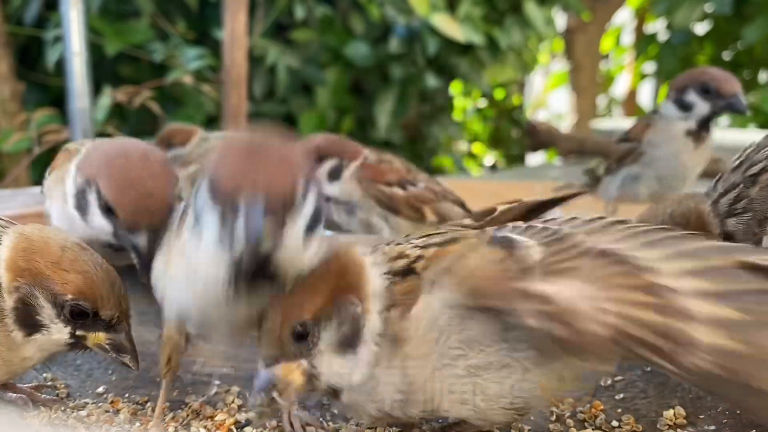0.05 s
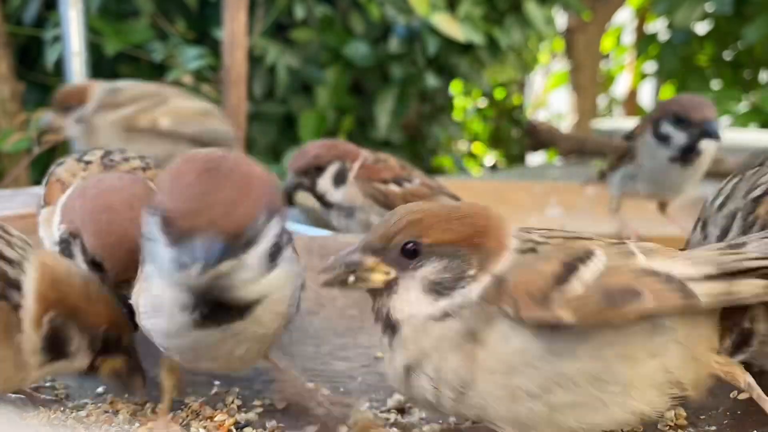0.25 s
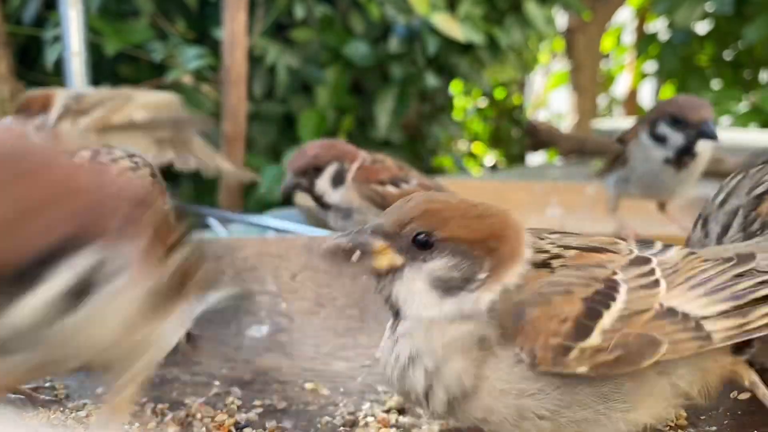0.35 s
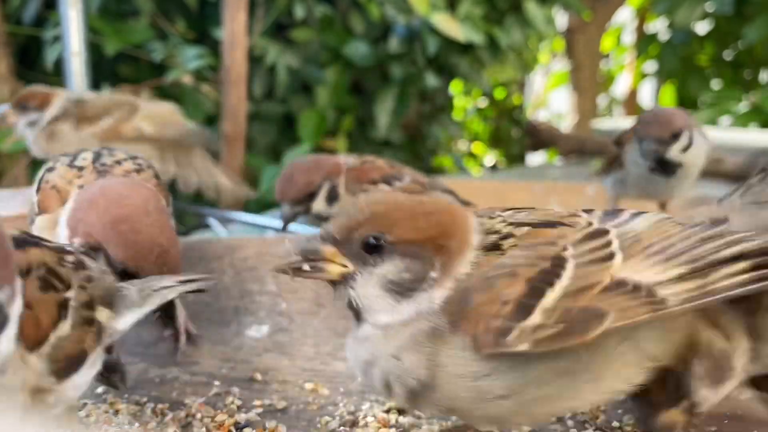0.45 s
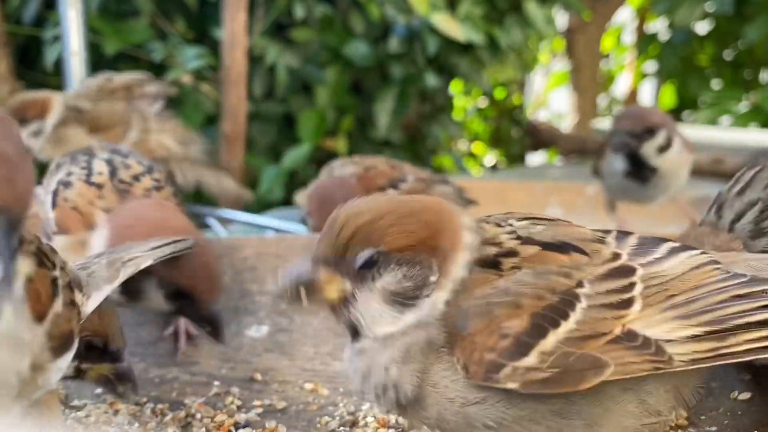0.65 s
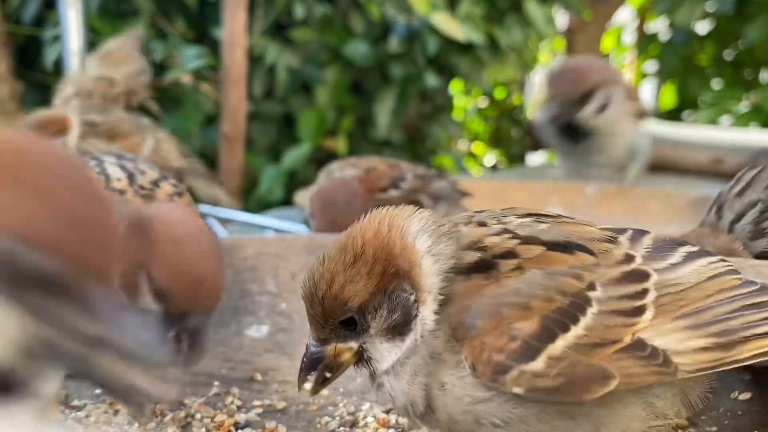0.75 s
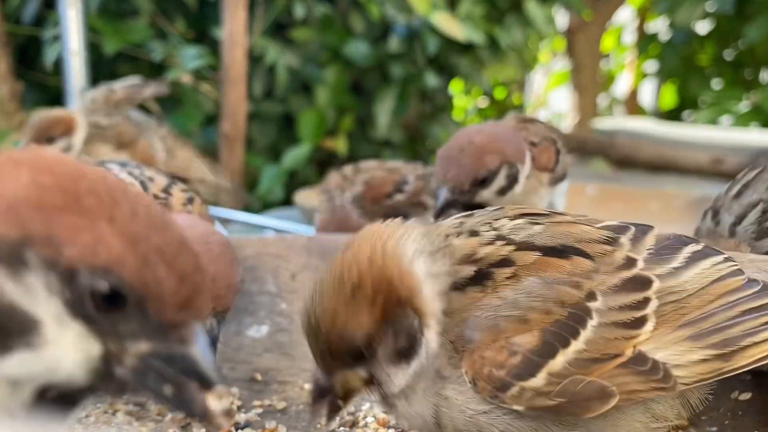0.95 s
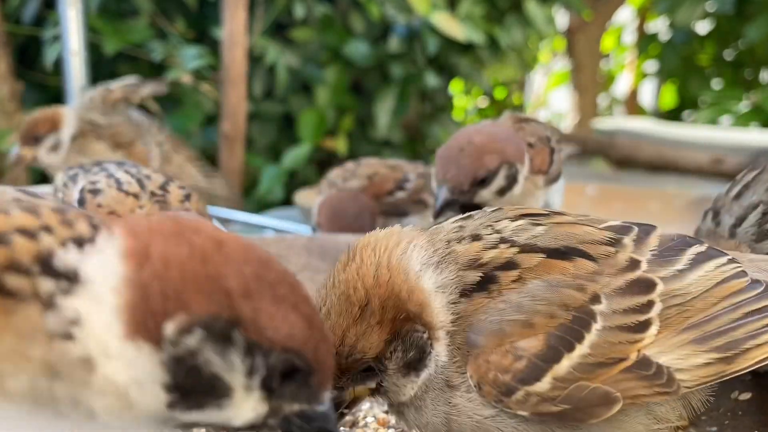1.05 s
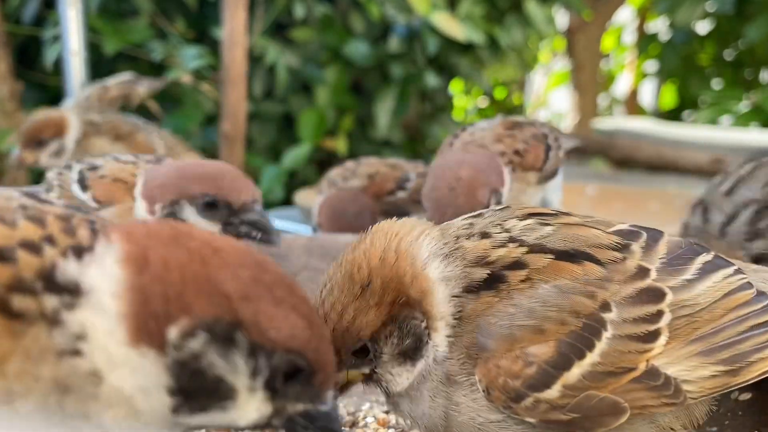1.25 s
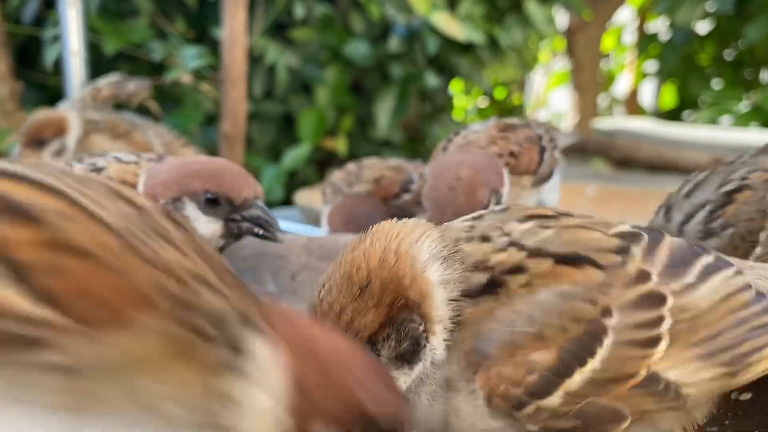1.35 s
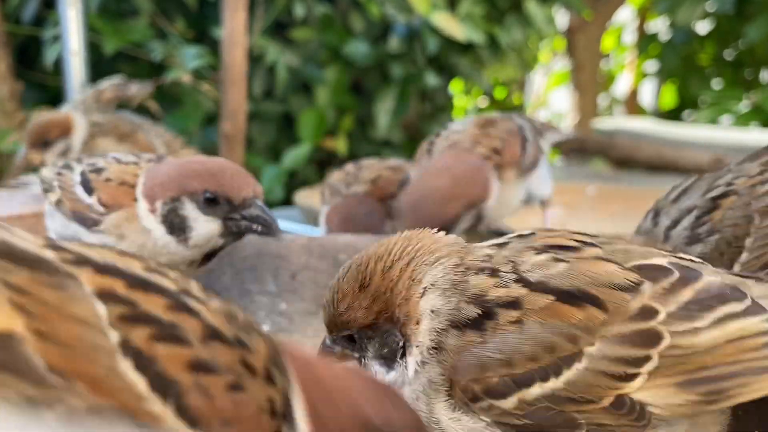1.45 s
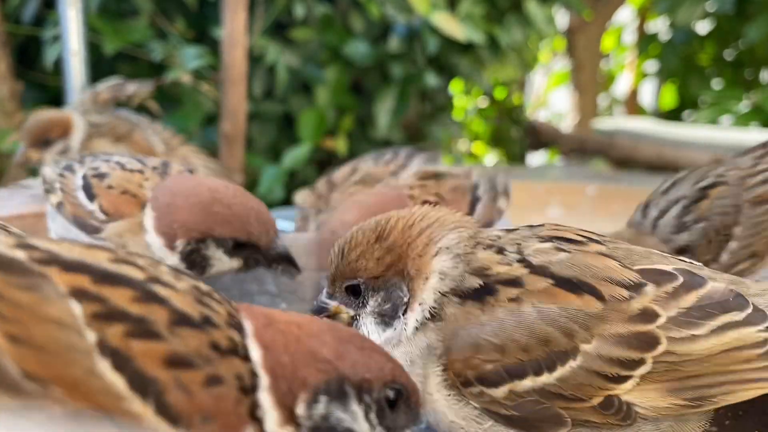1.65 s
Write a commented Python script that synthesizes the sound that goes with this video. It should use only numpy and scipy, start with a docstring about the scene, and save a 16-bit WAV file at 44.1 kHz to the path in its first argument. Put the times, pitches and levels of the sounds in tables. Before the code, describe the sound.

A sparrow chirps sharply twice, followed by light pecks and cracking seeds on a tray.

```python
"""Light taps, cracking seeds and a flutter come first: sparrows feed on a tray in a quiet garden.
Each beak blow excites the tray's damped modes; husks and wings give bursts and swells of noise.
A hand's width away, one bird gives two sharp, warbling chirps, and a third begins at the end.
Its syrinx makes a gliding whistle with hoarse edges, and its open beak filters the overtones."""
import sys
import numpy as np
from scipy import signal
from scipy.fft import rfft, irfft
from scipy.io import wavfile
from scipy.ndimage import uniform_filter1d

SR = 44100
rng = np.random.default_rng(int(sys.argv[2]) if len(sys.argv) > 2 else 0)


def output_pcm(signal):
    """Save a mono or channel-first signal as 16-bit PCM at the path in sys.argv[1].

    Samples are clipped to [-1, 1] before scaling.
    """
    pcm = np.clip(np.atleast_2d(signal).T, -1, 1) * 32767
    wavfile.write(sys.argv[1], SR, np.round(pcm).astype(np.int16))


N = 74970
TIME = np.arange(N) / SR

# Spectrum of the garden's background: frequency_hz, gain_db
GARDEN_SPECTRUM = [(24, -44), (36, -14), (48, 2), (105, -1), (170, -5), (300, -10.5), (620, -7.5),
                   (1000, -11.5), (2100, -18.5), (4600, -18.5), (8300, -29.5), (11500, -34.5), (13500, -49),
                   (15500, -29)]
# Likeness of that background at the two ears: frequency_hz, correlation
GARDEN_CORRELATION = [(60, 0.84), (170, 0.72), (300, 0.52), (550, -0.55), (1650, -0.25), (5000, 0.44),
                      (15000, -0.63)]
# Brushes of feet and feathers: start_s, length_s, level_db, centre_hz, half_width_octaves
BRUSH_STROKES = [(0, 0.15, -48, 51, 0.78), (0, 0.06, -51, 3570, 1.1), (0.165, 0.0099, -48.5, 3600, 0.64),
                 (0.418, .08, -51.5, 57, 0.16), (0.815, 0.042, -49.5, 66.4, 0.23),
                 (.911, 0.024, -47, 2180, 0.54), (0.899, .04, -53, 277, 0.32),
                 (1.1, 0.037, -48.5, 546, 0.1), (1.651, 0.044, -50, 222, 0.96)]
# Seed husks cracking, and the beak's tick just before the peck at 1.178 s: start_s, level_db, centre_hz
SNAPS = [(0.014, -38, 6400), (0.0385, -42, 5000), (0.0863, -53, 9100), (0.1012, -41.5, 6860),
         (.127, -47, 7150), (0.355, -43, 7060), (0.5951, -31, 16500), (.737, -53, 12800),
         (0.8243, -37, 5500), (.843, -58, 12000), (.981, -54, 11000), (1.1778, -44.5, 5700),
         (1.2231, -36, 5150), (1.2494, -49, 7400), (1.37, -45.5, 13100), (1.374, -46.5, 7900),
         (1.4008, -45, 5940), (1.417, -42, 4540), (1.519, -57, 10930), (1.536, -46.5, 6900),
         (1.63, -46.5, 6960)]
# Sway of the whole tray under pecks and landings: start_s, level_db, pitch_hz, t60_s
TRAY_THUMPS = [(0.212, -45.5, 111.3, 0.6), (0.829, -44, 107.6, 0.27), (0.919, -39.5, 103.7, 0.096),
               (1.113, -41.5, 130, .12), (1.181, -43.5, 101.5, 0.82), (1.412, -37, 157, 0.15),
               (1.422, -39, 106.3, 0.62)]
# Modes of the struck tray: frequency_hz, level_db, t60_s
TRAY_MODES = [(542, -34.5, 0.22), (707, -29, 0.19), (1262, -18, 0.062), (1495, -1.5, 0.011),
              (1830, -12, 0.041), (2157, -15.5, 0.024), (3180, -10, 0.0066)]
# Pecks on the tray, the glancing ones brighter: start_s, level_db, tilt_db_per_octave
BEAK_BLOWS = [(0.015, -37, 2), (0.04, -36, 5), (0.169, -36.5, 11), (0.1720, -36.5, 10), (0.2087, -33.5, 7),
              (0.56, -38, 8), (0.8242, -29, -1), (0.9178, -40.5, 7), (0.9214, -45, 11),
              (1.1775, -23.5, -3.5), (1.3992, -35, 6), (1.4179, -24, -2.5)]

# Contours of the three chirps: time_s, pitch_hz, whistle_db, rasp_db
WARBLED_CONTOUR = [(.206, 2700, -64, -63), (.214, 2797, -62, -60), (.223, 2807, -47, -40),
                   (.230, 2924, -51, -10.5), (.233, 3270, -14.5, -4), (.2355, 3940, -14.5, -20),
                   (.238, 4700, -1.5, -31), (.242, 5287, -13.5, -11.5), (.245, 4850, -2, -22.5),
                   (.249, 3613, -14, -18), (.252, 3294, -13, -33), (.255, 3720, -10.5, -19),
                   (.258, 4755, 2, -34), (.2605, 4293, -13, -35), (.263, 2962, -14.5, -36),
                   (.2675, 4326, -5.5, -36), (.272, 3273, -11, -33), (.275, 4126, -8, -36),
                   (.278, 3376, -9, -38), (.287, 3130, -9.5, -40), (.289, 2970, -25, -17),
                   (.296, 2904, -22, -20), (.305, 2435, -27.5, -21), (.307, 2300, -37, -25),
                   (.312, 2170, -39, -30.5), (.320, 1950, -42, -54)]
ARCHED_CONTOUR = [(.368, 3700, -70, -36), (.376, 3742, -43, -34), (.383, 3714, -43, -23),
                  (.390, 3974, -41, -21), (.397, 4040, -20, -18), (.400, 4400, -20.5, -22),
                  (.404, 5547, -19, -24.5), (.410, 6240, -28.5, -23.5), (.414, 5520, -17.5, -29),
                  (.418, 4113, -17.5, -25), (.422, 3570, -21, -16), (.4255, 2696, -41, -57),
                  (.429, 3366, -16, -26), (.433, 4172, -18.5, -39), (.438, 3690, -7.5, -18),
                  (.443, 4084, -12.5, -36), (.447, 3228, -21, -32), (.456, 2960, -39, -22.5),
                  (.460, 3137, -12, -49), (.465, 3234, -14.5, -43), (.474, 3920, -14, -41),
                  (.481, 4300, -22, -41), (.483, 4370, -26, -36), (.494, 3970, -36, -49),
                  (.496, 5000, -44, -48), (.503, 5070, -35, -58), (.508, 4700, -60, -60)]
RISING_CONTOUR = [(1.660, 2290, -67, -68), (1.677, 2288, -53, -57), (1.686, 2558, -44, -52),
                  (1.693, 2870, -34, -29), (1.697, 3590, -27, -34), (1.700, 4810, -18.5, -44)]
# The other side of the syrinx, joining at the top of the first chirp: time_s, pitch_hz, level_db
SECOND_SIDE_CONTOUR = [(.236, 4905, -17), (.240, 5780, -11.5), (0.242, 6100, -7), (0.247, 5684, -10),
                       (0.248, 4625, -3), (0.254, 4320, -37), (0.257, 3650, -10), (0.265, 4380, -39)]
# Overtones of the whistle, before the beak's filter: pitch_multiple, level_db
WHISTLE_OVERTONES = [(2, -18.5), (3, -27.5)]
# Noise bands of the rough voice, before the beak's filter: pitch_multiple, level_db
HOARSE_BANDS = [(1, -16), (2, -1.5), (3, -22.5)]
# Bands between the harmonics, from period doubling: pitch_multiple, level_db
PERIOD_DOUBLING_BANDS = [(1.5, -8.5), (2.5, -35)]
# Response of the open beak: frequency_hz, gain_db
BEAK_RESPONSE = [(1000, 13), (3000, 5.5), (4500, 4.5), (6300, -12), (7700, -14), (9000, -27.5),
                 (11500, -0.5), (12400, -25), (13200, -49), (16000, -46)]
# Spectrum of air hissing through the beak: frequency_hz, gain_db
BREATH_SPECTRUM = [(300, -30), (1200, -10.5), (2100, -13.5), (3200, 7), (4200, 5.5), (6300, -1),
                   (7600, -8.5), (9000, -20.5), (11000, -7.5), (12300, -15.5), (13000, -28), (16000, -21)]
# Envelope of that hiss: time_s, level_db
BREATH_ENVELOPE = [(0.203, -55), (0.206, -45.5), (0.216, -32), (0.226, -21.5), (.243, -27), (0.258, -18.5),
                   (0.278, -27), (.311, -42), (.326, -66), (.366, -55), (0.378, -35.5), (0.394, -31.5),
                   (.408, -39.5), (.426, -32), (0.437, -30), (.452, -33.5), (0.488, -33), (0.499, -38.5),
                   (.515, -92), (1.655, -58.5), (1.678, -50), (1.700, -29.5)]
# The bird at the right ear, relative to the left: frequency_hz, gain_db
RIGHT_EAR_RESPONSE = [(700, -40), (1400, 0.5), (2500, -15.5), (3300, -8), (4000, -4), (4700, -3.5),
                      (6000, -5.5), (8000, -0.5), (15000, 1)]

JITTER, SHIMMER, UNSTEADY_HZ = 0.011, 0.11, 730  # rms fractions of pitch and amplitude; their bandwidth
HOARSE_WIDTH_HZ, RIGHT_LAG_S = 520, .000025
PECK_RISE_S, THUMP_RISE_S = 0.00208, 0.0022
CRACK_T60_S, CRUMBS_PER_S = 0.013, 54
THRESHOLD_DB, DUCK_SHARE, RECOVER_DB_PER_S = -26.5, 0.3, 66
CUTOFF_HZ = 16300


def amp(db):
    """Amplitude grows tenfold for every 20 dB."""
    return 10 ** (np.asarray(db) / 20)


def unit(x):
    """Normalisation brings a signal to an rms of one."""
    return x / np.sqrt(np.mean(abs(x) ** 2) + 1e-20)


def read_curve(points, hz):
    """Interpolation along log frequency joins a table's points."""
    table_hz, value = np.transpose(points)
    return np.interp(np.log(hz + 1), np.log(table_hz + 1), value)


def colour(x, response):
    """A linear filter multiplies the spectrum by its response."""
    hz = np.fft.rfftfreq(len(x), 1 / SR)
    return irfft(rfft(x) * amp(read_curve(response, hz)), len(x))


def band_noise(count, centre_hz, octaves):
    """Band-pass filtering confines white noise to a bell-shaped band."""
    detuning = np.log2((np.fft.rfftfreq(count, 1 / SR) + 1) / centre_hz) / octaves
    return unit(irfft(rfft(rng.standard_normal(count)) / (1 + detuning ** 2), count))


def wander(bandwidth_hz):
    """Low-pass filtering turns white noise into smooth random motion."""
    low_pass = np.exp(-(np.fft.rfftfreq(N, 1 / SR) / bandwidth_hz) ** 2)
    return unit(irfft(rfft(rng.standard_normal(N)) * low_pass, N))


def envelope(time_s, level_db):
    """Amplitude changes exponentially between points and is silent outside them."""
    return amp(np.interp(TIME, time_s, level_db, left=-150, right=-150))


def add(mix, start_s, sound):
    """Superposition: a sound adds to the mix from its start time."""
    part = mix[..., max(round(start_s * SR), 0):][..., :sound.shape[-1]]
    part += sound[..., :part.shape[-1]]


def echoes(x, level_db, t60_s):
    """Scattered reflections, different at each ear, decay exponentially."""
    t = np.arange(SR // 2) / SR
    taps = rng.standard_normal((2, len(t)))
    arrivals = (rng.random(taps.shape) < .1) * (t > .001)
    taps *= arrivals * amp(-60 * t / t60_s)
    taps /= np.linalg.norm(taps, axis=1, keepdims=True)
    return amp(level_db) * signal.fftconvolve(x, taps, axes=1)[:, :N]


def garden(level_db=-49, patch_db=.8):
    """Distant rumble and leaf hiss form a noise field, partly correlated between the ears."""
    hz = np.fft.rfftfreq(1024, 1 / SR)
    left_re, left_im, other_re, other_im, patches = rng.standard_normal((N // 256 + 5, 513, 5)).T
    patches = uniform_filter1d(patches, size=14, axis=0)  # the level drifts in patches of frequency
    patches = unit(uniform_filter1d(patches, size=10, axis=1))  # and of time
    correlation = np.clip(read_curve(GARDEN_CORRELATION, hz), -1, 1)[:, None]
    left = left_re + 1j * left_im
    right = correlation * left + np.sqrt(1 - correlation ** 2) * (other_re + 1j * other_im)
    spectra = np.array([left, right]) * amp(patch_db * patches)
    noise = signal.istft(spectra, nperseg=1024, noverlap=768)[1][:, :N]
    return amp(level_db) * unit(np.array([colour(side, GARDEN_SPECTRUM) for side in noise]))


def wings_and_feet():
    """Air moved by wings and the friction of feet give soft swells of band noise."""
    out = np.zeros(N)
    for start_s, length_s, level_db, centre_hz, octaves in BRUSH_STROKES:
        swell = np.hanning(round(length_s * SR))
        noise = unit(band_noise(SR // 2, centre_hz, octaves)[:len(swell)])
        add(out, start_s, amp(level_db) * swell * noise)
    return out


def snap(centre_hz):
    """A brief impulse is heard as a fast-decaying band of noise, here independent at each ear."""
    t = np.arange(2048) / SR
    noise = np.array([band_noise(len(t), centre_hz, octaves=0.37) for ear in range(2)])
    return amp(-60 * t / CRACK_T60_S) * noise


def seeds():
    """Fracturing husks and a beak's tick snap, and the impacts of crumbs tick on the tray at random."""
    out = np.zeros((2, N))
    for start_s, level_db, centre_hz in SNAPS:
        add(out, start_s, amp(level_db) * snap(centre_hz))
    for when, faintness, brightness in rng.random((round(CRUMBS_PER_S * N / SR), 3)):
        level_db = -76.5 - 13 * np.log(faintness + 0.081)  # many faint ticks, few strong ones
        add(out, when * N / SR, amp(level_db) * snap(5000 + 9000 * brightness))
    return out


def tray_thumps():
    """The whole tray sways as a damped oscillator of low frequency."""
    out, t = np.zeros(N), np.arange(SR // 2) / SR
    for start_s, level_db, pitch_hz, t60_s in TRAY_THUMPS:
        rise = np.sin(np.pi / 2 * np.minimum(t / THUMP_RISE_S, 1)) ** 2
        add(out, start_s, amp(level_db - 60 * t / t60_s) * rise * np.sin(2 * np.pi * pitch_hz * t))
    return out


def pecks():
    """A beak's impact excites the tray's modes, and each decays at its own rate."""
    out, t = np.zeros(N), np.arange(SR // 10) / SR
    rise = np.sin(np.pi / 2 * np.minimum(t / PECK_RISE_S, 1)) ** 4
    since_peak = t - PECK_RISE_S
    strongest_hz = max(TRAY_MODES, key=lambda mode: mode[1])[0]
    for start_s, level_db, tilt_db_per_octave in BEAK_BLOWS:
        ring = np.zeros(len(t))
        for hz, mode_db, t60_s in TRAY_MODES:
            tilt_db = tilt_db_per_octave * np.log2(hz / strongest_hz)
            decay_db = 60 * np.maximum(since_peak, 0) / t60_s
            ring += amp(mode_db + tilt_db - decay_db) * np.sin(2 * np.pi * hz * since_peak)
        add(out, start_s, amp(level_db) * rise * ring)
    pair = np.array([out, out * amp(-7.5)])  # weaker on the right
    return pair + echoes(pair, level_db=-12, t60_s=0.18)


def syrinx_phase(time_s, pitch_hz):
    """The phase of one side of the syrinx is the integral of its gliding, jittering frequency."""
    glide_hz = uniform_filter1d(np.interp(TIME, time_s, pitch_hz), size=66)
    return 2 * np.pi * np.cumsum(glide_hz * (1 + JITTER * wander(UNSTEADY_HZ))) / SR


def whistle(phase):
    """A nearly sinusoidal oscillation of unsteady amplitude has weak overtones, filtered by the beak."""
    overtones = sum(amp(db) * np.sin(round(multiple) * phase) for multiple, db in WHISTLE_OVERTONES)
    tone = np.sin(phase) + colour(overtones, BEAK_RESPONSE)
    return np.sqrt(2) * tone * (1 + SHIMMER * wander(UNSTEADY_HZ))


def rasp(phase):
    """Random modulation broadens harmonics and period-doubling lines into hoarse bands."""
    bands = np.zeros(N)
    for multiple, level_db in HOARSE_BANDS + PERIOD_DOUBLING_BANDS:
        in_phase = wander(HOARSE_WIDTH_HZ) * np.sin(multiple * phase)
        quadrature = wander(HOARSE_WIDTH_HZ) * np.cos(multiple * phase)
        bands += amp(level_db) * (in_phase + quadrature)
    return colour(bands, BEAK_RESPONSE)


def chirp(contour):
    """One frequency-modulated oscillation carries both whistle and rasp, each with its own envelope."""
    time_s, pitch_hz, whistle_db, rasp_db = np.transpose(contour)
    phase = syrinx_phase(time_s, pitch_hz)
    return envelope(time_s, rasp_db) * rasp(phase) + envelope(time_s, whistle_db) * whistle(phase)


def right_ear(left):
    """Sound from the left reaches the far ear later and filtered."""
    padded = np.pad(left, (0, SR // 4))
    delay = np.exp(-2j * np.pi * np.fft.rfftfreq(len(padded), 1 / SR) * RIGHT_LAG_S)
    return irfft(rfft(colour(padded, RIGHT_EAR_RESPONSE)) * delay, len(padded))[:N]


def sparrow():
    """The two sides of the syrinx oscillate independently while air hisses through the beak."""
    left = chirp(WARBLED_CONTOUR) + chirp(ARCHED_CONTOUR) + chirp(RISING_CONTOUR)
    time_s, pitch_hz, level_db = np.transpose(SECOND_SIDE_CONTOUR)
    left += envelope(time_s, level_db) * whistle(syrinx_phase(time_s, pitch_hz))
    breath = unit(colour(rng.standard_normal(N), BREATH_SPECTRUM))
    left += envelope(*np.transpose(BREATH_ENVELOPE)) * breath
    pair = np.array([left, right_ear(left)])
    near_echoes = echoes(pair, level_db=-11, t60_s=0.035)
    far_echoes = echoes(pair, level_db=-29, t60_s=0.27)
    return pair + near_echoes + far_echoes


def scene():
    """The pressures of all sources at the feeder add linearly."""
    return sparrow() + pecks() + tray_thumps() + seeds() + wings_and_feet() + garden()


def record(dry):
    """Gentle compression ducks the whole mix at a loud chirp; a low-pass filter limits the band."""
    power = uniform_filter1d((dry ** 2).mean(0), size=300)
    power_db = 10 * np.log10(abs(power) + 1e-12)
    fall_db = TIME * RECOVER_DB_PER_S
    held_db = np.maximum.accumulate(power_db + fall_db) - fall_db  # each peak fades at a steady rate
    excess_db = np.maximum(held_db - THRESHOLD_DB, 0)
    ducked = dry * amp(-DUCK_SHARE * uniform_filter1d(excess_db, size=200))
    low_pass = signal.firwin(255, CUTOFF_HZ, window=("kaiser", 9), fs=SR)
    return signal.oaconvolve(ducked, low_pass[None], "same")


dry = scene()
out = record(dry)
output_pcm(out)
```